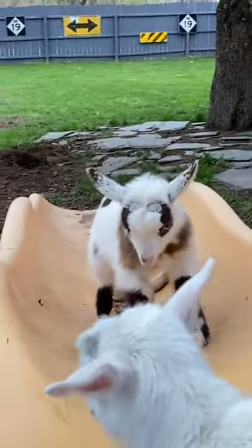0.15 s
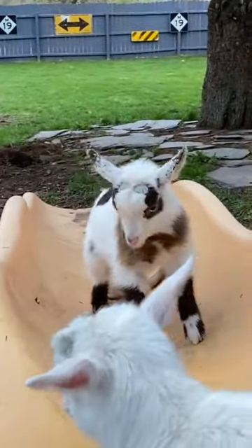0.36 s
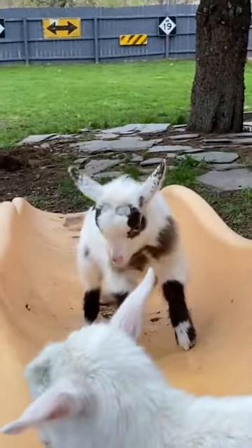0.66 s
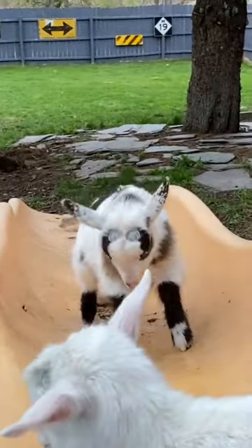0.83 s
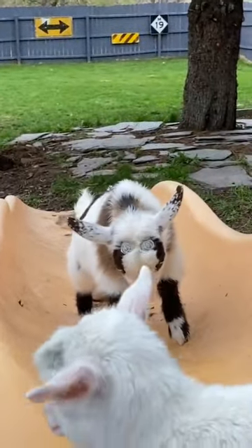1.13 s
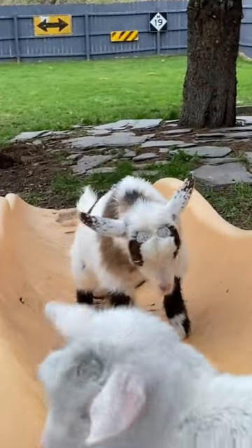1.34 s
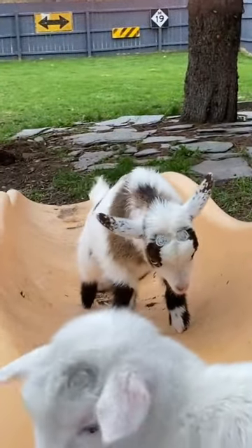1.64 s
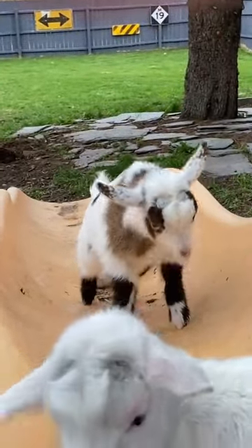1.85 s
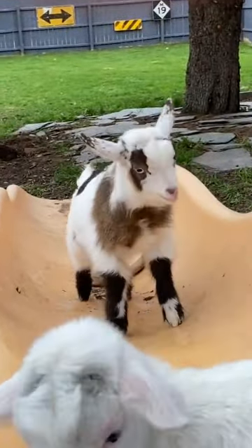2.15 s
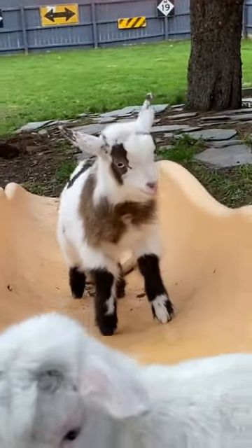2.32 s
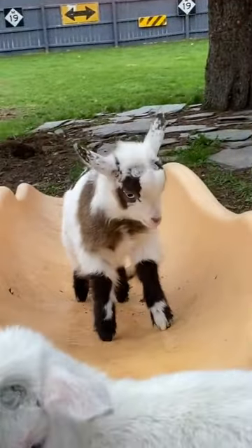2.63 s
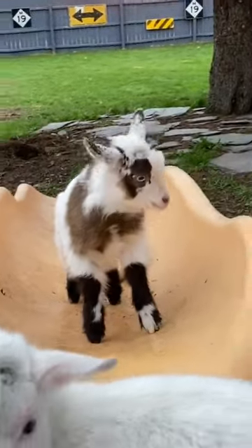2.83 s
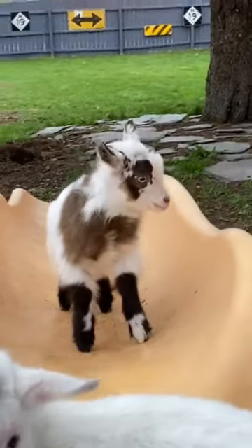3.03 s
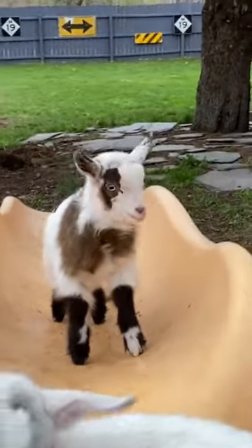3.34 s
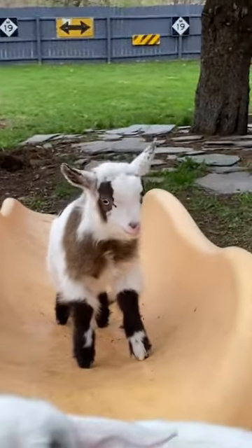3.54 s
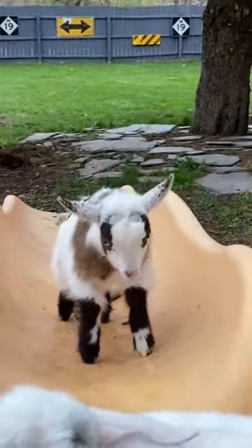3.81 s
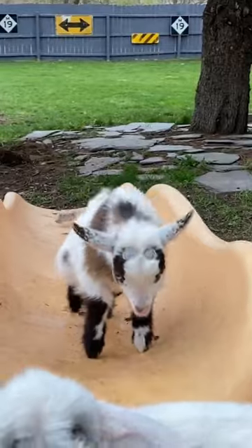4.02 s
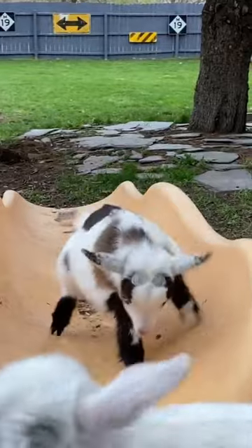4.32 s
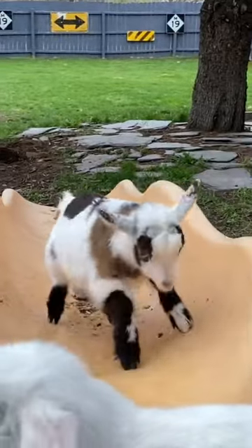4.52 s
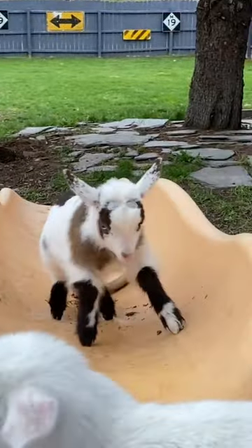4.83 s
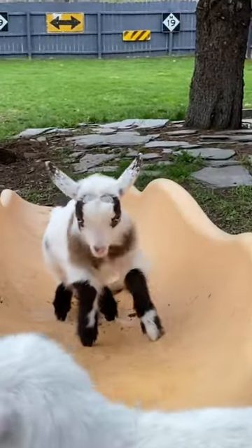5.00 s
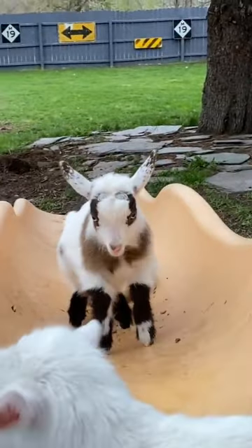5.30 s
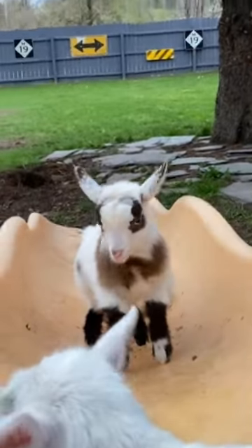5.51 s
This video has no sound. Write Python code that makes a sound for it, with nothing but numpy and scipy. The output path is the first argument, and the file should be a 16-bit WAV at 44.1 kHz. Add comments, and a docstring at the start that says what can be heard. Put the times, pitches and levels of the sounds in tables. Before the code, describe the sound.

Close stereo pickup beside a plastic playground slide in an open yard. Quiet traffic hum and very faint fur rustles and hoof skids come first, then a rapid run of loud, boomy, hollow knuckle knocks that fade. Later a goat's light hooves patter and slither in a dense half-second burst with hissing grit, then a few soft taps, and a single strong knock closes it.

```python
"""A young goat's hooves and fur skid and rustle on a hollow plastic slide on a lawn; faint peeps come between.
From 2.5 s knuckles rap the shell close by, and the fence returns an echo; near 4 s the goat slithers and
skips, with grit hissing under its hooves, and at 5.5 s comes a last rap. Distant traffic rumbles throughout.
Blows are decaying modes plus band-filtered noise, hiss and traffic are shaped noise, peeps are gliding sines."""
import sys
import numpy as np
from scipy import signal
from scipy.fft import rfft, irfft
from scipy.io import wavfile

SR = 44100
rng = np.random.default_rng(int(sys.argv[2]) if len(sys.argv) > 2 else 0)


def wav_record(signal):
    """Record a signal, one row per channel, as 16-bit PCM in the file named by sys.argv[1]."""
    frames = np.transpose(np.atleast_2d(signal))
    bounded = np.clip(frames, -1, 1)
    # unit amplitude maps onto the largest positive 16-bit level
    quanta = np.round(bounded * 32767).astype(np.int16)
    wavfile.write(sys.argv[1], SR, quanta)


N = 249606
BINS = np.maximum(np.arange(N // 2 + 1) * SR / N, 1)   # spectrum frequencies in Hz

# Knuckle raps. Each row: start in seconds, level in dB, damping factor, weight in dB,
# knock over body in dB, hardness in dB.
KNUCKLE_RAPS = [(2.475, -70.5, 0.54, 8.5, 11, 23.5), (2.71, -12.5, 0.89, -0.5, -3, -3.5),
                (2.891, -9.5, 1.04, -3, -3.5, -6.5), (3.039, -12.5, 1.15, 0.5, -5.5, -3),
                (3.179, -14.5, 1.01, -1.5, -2.5, -7), (3.316, -19.5, 1.17, 0, -6, -0.5),
                (5.505, -10.5, 1.16, -2.5, -1, -4.5)]
# Hoof falls. Each row: start in seconds, level in dB, damping factor, weight in dB,
# knock over body in dB, hardness in dB.
HOOF_FALLS = [(.022, -30.5, 2.2, -15, 15.5, -16.5), (.04, -41, 1.1, -5.5, 9, -14),
              (.075, -49.5, .9, -10, -1, -25), (4.113, -17.5, 1.84, -10, -1.5, -16.5),
              (4.125, -22, 0.87, -11.5, -8, -32), (4.148, -27, 0.95, 3, 5, -10.5),
              (4.16, -28, 1.3, -11, 7, -26), (4.174, -31, 0.63, -3.5, 6, -21),
              (4.207, -15, 1.44, -11, 4.5, -17), (4.213, -30.5, 1.5, -20, -6, -6),
              (4.231, -24.5, 0.6, -12, -0.5, -22.5), (4.271, -23, 1.3, -1.5, 2.5, -11.5),
              (4.28, -26, 0.95, -9, -3, -12), (4.302, -26, 0.69, -8, 1, -29),
              (4.32, -33, 1.1, 3.5, -5, -17), (4.332, -36.5, 0.67, -5, -2.5, -14),
              (4.365, -37, 1.1, -1, 2.5, -12), (4.794, -31.5, 1.1, -14.5, -2, -21),
              (4.819, -37.5, 0.82, -8, -2, -20), (4.845, -42.5, 1, -12, 1, -18)]
# Centres of a blow's boom, body, knock, clack and crack, in Hz.
STRIKE_CENTRES_HZ = (110, 370, 800, 1800, 4500)
# Modes of the shell. Each row: frequency in Hz, relative level in dB, decay time t60 in seconds at damping 1.
SHELL_MODES = [(47.4, -4.5, .3), (62.6, -5, 0.58), (91.9, -10.5, 0.38), (114.1, -5, 0.34),
               (140, -0.5, 0.26), (170.7, -12.5, 0.16), (201.3, -10.5, 0.11), (230, -14, 0.18),
               (277.3, -17.5, 0.35), (318, -11.5, 0.21), (387, -8, 0.14), (486.7, -2.5, 0.07),
               (553.3, -9, 0.11), (702.6, -9, 0.089), (788, -8, .11), (879, -10.5, 0.051),
               (1017.6, -9, 0.14), (1224, -24, 0.094), (1443, -8, 0.14), (1620, -20, 0.058),
               (1994, -11.5, 0.012), (2360, 5.5, 0.0085), (2907, -7.5, 0.02), (3270, 2.5, 0.0082),
               (3860, 1, 0.011), (4430, 2.5, 0.0097), (5030, -2.5, 0.013), (6140, 0, 0.0083),
               (8000, -12, 0.0296), (11330, -19, 0.0035)]
# Dense small modes, heard as dying noise. Each row: frequency in Hz, relative density in dB per Hz.
RATTLE_SPECTRUM = [(100, -2), (150, -3.5), (254, -7), (420, -8.5), (700, -8.5), (1040, -11), (1400, -9.5),
                   (1700, -2), (2300, -12.5), (4000, -22.5), (6640, -29.5), (8500, -37.5), (11000, -36),
                   (13500, -74), (16000, -70)]
# Decay of that noise. Each row: frequency in Hz, decay time t60 in seconds at damping 1.
RATTLE_DECAY = [(150, .22), (500, 0.21), (2000, 0.088), (6000, 0.12), (14000, 0.0476)]
# Phase between the ports for raps. Each row: frequency in Hz, lead of the left port in radians.
RAP_PHASE_LEAD = [(0, 0), (60, -.45), (130, -.85), (290, -1.55), (640, -2.1), (2150, -3.6), (3700, -7.3),
                  (6200, -12.6), (9700, -18.3), (16500, -25.3)]
# Level between the ports for raps. Each row: frequency in Hz, left over right in dB.
RAP_PORT_BALANCE = [(60, -6.5), (150, -2), (380, -8), (950, -1.5), (2380, 1), (5980, 8), (15000, -6.5)]
# Coherence of the ports for hooves. Each row: frequency in Hz, left-right likeness from -1 to 1.
HOOF_COHERENCE = [(60, 1), (180, 0.88), (550, 0.71), (1650, 0.12), (4970, 0.018), (15000, 0.4)]
# Short skids on grit. Each row: time of the top in seconds, top level in dB, rise in seconds, fall in seconds.
SHORT_SKIDS = [(.04, -68, 0.056, .1), (.2, -65, 0.24, 0.095), (.512, -76, .02, .05),
               (.875, -66.5, 0.073, 0.028), (1.9, -79, .015, .08), (2.05, -70, .03, 0.11),
               (3.76, -69, 0.045, 0.08), (3.905, -61, .02, 0.098), (3.95, -64.5, 0.085, 0.017),
               (4.562, -64, .04, 0.036), (4.688, -60, .035, 0.052), (4.75, -74, .04, .03),
               (4.8, -62, 0.013, 0.088), (5.025, -59.5, 0.16, 0.051), (5.078, -64, 0.018, 0.039),
               (5.288, -76, .04, 0.12)]
# The long slither. Each row: time in seconds, level in dB.
LONG_SLITHER = [(3.97, -76), (4.075, -53.5), (4.1, -51.5), (4.165, -44), (4.22, -45.5), (4.265, -51.5),
                (4.29, -56.5), (4.338, -51), (4.396, -59), (4.47, -60.5), (4.51, -79)]
# Spectrum of the grit hiss. Each row: frequency in Hz, relative density in dB per Hz.
GRIT_SPECTRUM = [(1470, -44), (2500, -13), (4210, -23.5), (6760, -12), (8370, -22), (9270, -13.5),
                 (10700, -5.5), (12700, -21), (13400, -63), (14000, -30), (15000, -22), (16100, -37),
                 (16500, -61)]
# Lone grit ticks. Each row: start in seconds, peak level in dB, frequency in Hz.
GRIT_TICKS = [(1.8994, -61, 5050), (4.1123, -32, 4950), (4.27, -29, 10600), (5.1517, -55, 6090),
              (5.1951, -64, 4680), (5.2857, -49, 4600)]
# Fur rustles on the shell. Each row: time of the top in seconds, top level in dB, rise in seconds,
# fall in seconds.
FUR_RUSTLES = [(.23, -62.5, 0.33, .2), (.354, -61, 0.026, 0.04), (.97, -63.5, 0.05, 0.23),
               (1.1, -58.5, 0.16, 0.13), (1.165, -60.5, .15, .05), (1.872, -68, .01, .15),
               (2.088, -66, 0.076, 0.044)]
# Spectrum of the rustle. Each row: frequency in Hz, relative density in dB per Hz.
RUSTLE_SPECTRUM = [(1000, -31), (1700, 1.5), (1800, -20), (2020, -3), (2440, -19), (2640, -11), (4240, -15),
                   (5450, -21.5), (6310, -18.5), (8570, -39), (9000, -46), (11700, -71), (19800, -120)]
# Brief faint tones, mostly far birds. Each row: start in seconds, length in seconds, start frequency in Hz,
# end frequency in Hz, level in dB.
FAINT_TONES = [(1.217, .025, 3170, 2950, -61.5), (2.207, 0.087, 3130, 3270, -64),
               (5.231, 0.029, 555, 550, -42), (5.34, 0.031, 5700, 5700, -66),
               (5.581, 0.058, 3600, 3430, -59.5)]
# Distant traffic. Each row: time in seconds, rumble level in dB, rush level in dB.
TRAFFIC_LEVELS = [(0, -53, -52), (.4, -51, -54), (1.4, -52, -55), (2.4, -51.5, -54.5), (3.5, -48, -51.5),
                  (4.0, -45.5, -48.5), (4.5, -45, -49), (5.0, -46.5, -48), (5.3, -47.5, -47.5),
                  (5.66, -42, -46.5)]
# Spectrum of the traffic. Each row: frequency in Hz, relative density in dB per Hz.
TRAFFIC_SPECTRUM = [(25, -20), (58, -4), (78, -0.5), (127, -8.5), (200, -17), (340, -23.5), (520, -21),
                    (900, -19.5), (1300, -22), (1700, -24.5), (2760, -35.5), (4490, -43), (8000, -54.5),
                    (16000, -71.5)]
# Coherence of the ports for traffic. Each row: frequency in Hz, left-right likeness from -1 to 1.
TRAFFIC_COHERENCE = [(60, 0.97), (150, 0.85), (380, 0.27), (950, -0.11), (2380, 0.19), (5980, 0.083),
                     (15000, -0.41)]
# Level between the ports for traffic. Each row: frequency in Hz, left over right in dB.
TRAFFIC_PORT_BALANCE = [(60, -4), (180, -3), (550, 0.5), (1650, 3), (4970, 2), (15000, -5)]

RAP_CRACK_DB, HOOF_CRACK_DB = 0.4, -8   # crack over clack
SNAP_DB, SNAP_S = 5.5, 0.0017   # extra rattle at the first instant of contact, and its time constant
AHEAD_S, AHEAD_DB = .0025, -18.5   # a faint bright copy of each rap, 2.5 ms ahead of it
YARD_DB, YARD_T60_S, YARD_SPREAD_DB = -56.5, 0.36, 4.5   # scatter from trunk, stones and walls
FENCE_S, FENCE_DB = .0645, -39   # delay and level of the fence echo
BEYOND_S, BEYOND_DB = 0.23, -5   # end of the answers, and level change past the fence
BRIGHT_HZ = 1560   # the copy ahead, the scatter and the echo carry mainly what lies above this
SWELL_DB = 16.5   # gained over a rise, lost over a fall
DRAG_DB, DRAG_FOLLOWS = -44, 1.36   # rustle under the loudest skidding; share of the hiss's swing in dB
CUTOFF_HZ = 16900


def from_db(db):
    """Amplitude ratio: 20 dB to each factor of ten."""
    return 10 ** (np.asarray(db) / 20)


def rms_one(x):
    """Normalisation: divide by the root mean square."""
    return x / np.sqrt(np.mean(x ** 2) + 1e-20)


def in_time(rows):
    """Linear interpolation of each column of a time curve at every sample."""
    seconds, *columns = np.transpose(rows)
    return [np.interp(np.arange(N) / SR, seconds, column) for column in columns]


def at_hz(points, hz):
    """Interpolation of a spectrum along a logarithmic frequency axis."""
    point_hz, values = np.array(points)[:, 0], np.array(points)[:, 1]
    return np.interp(np.log(hz), np.log(point_hz), values)


def drift(rate_hz):
    """Slow random fluctuation: white noise through two equal low-pass poles, rms about 1."""
    pole = np.exp(-2 * np.pi * rate_hz * 40 / SR)   # one step is 40 samples
    white = rng.standard_normal(N // 40 + 2002)
    slow = signal.lfilter([1], [1, -2 * pole, pole * pole], white)[2000:]   # filter has settled
    return np.interp(np.arange(N) / 40, np.arange(len(slow)), rms_one(slow))


def coloured(spectrum, grain_db=0.):
    """Spectral shaping: white noise weighted by frequency, rms 1; uneven grain sizes make it gritty."""
    sizes = from_db(grain_db * np.minimum(rng.exponential(1, N), 5))
    grains = rng.standard_normal(N) * sizes
    return rms_one(irfft(rfft(grains) * from_db(at_hz(spectrum, BINS)), N))


def ports(mid, side, alike, balance_db=0, lead=0):
    """Coherence: two ports mix a shared and an unshared part, with level and phase difference by frequency."""
    alike = np.clip(alike, -1, 1)
    tilt = from_db(balance_db / 2) * np.exp(.5j * lead)
    shared = np.sqrt(1 + alike) * rfft(mid)
    own = np.sqrt(1 - alike) * rfft(side)
    left_right = np.array([(shared + own) * tilt, (shared - own) / tilt])
    return irfft(left_right, N) / np.sqrt(2)


def shell_modes(strike, damping, spread_db, rise_cycles, smear_cycles, t):
    """Modal superposition: a blow excites decaying sines, and the lows take longer to swell."""
    hz, mode_db, t60 = np.transpose(SHELL_MODES)[:, :, None]
    sign = (-1) ** np.arange(len(hz))[:, None]   # neighbouring modes start in opposite directions
    fickle = np.clip(hz / 700, .2, 1)   # long waves hardly notice where the blow lands
    late = smear_cycles * fickle / hz * rng.random((2, len(hz), 1))   # the contact rolls over part of its cycles
    chance_db = spread_db * fickle * rng.standard_normal((2, len(hz), 1))
    gain = from_db(mode_db + at_hz(strike, hz) + chance_db)
    age = np.maximum(t - late, 0)
    rise = 1 - np.exp(-age * hz / rise_cycles)
    fade = from_db(-60 * damping * age / t60) * rise
    return np.sum(sign * gain * fade * np.sin(2 * np.pi * hz * age), axis=1)


def shell_rattle(strike, damping, rattle_db, t):
    """High modal density: crowded small modes act as noise bands, each dying at its own rate."""
    edges = 120 * 2 ** np.arange(0, 7.3, .5)   # half-octave bands, in Hz
    snap = 1 + from_db(SNAP_DB) * np.exp(-t / SNAP_S)
    # loose joints chatter unevenly, in lumps of 100 samples
    lumps = np.repeat(from_db(1.73 * rng.standard_normal(len(t) // 100 + 1)), 100)[:len(t)]
    white = rng.standard_normal((2, 2, len(t))) * lumps
    sound = np.zeros((2, len(t)))
    for k, (low, high) in enumerate(zip(edges, edges[1:])):
        centre = np.sqrt(low * high)
        level_db = rattle_db + at_hz(RATTLE_SPECTRUM, centre) + at_hz(strike, centre)
        dying = from_db(level_db - 60 * damping * t / at_hz(RATTLE_DECAY, centre)) * snap
        band = signal.butter(2, (low, high), "band", fs=SR, output="sos")
        sound += signal.sosfilt(band, white[k % 2] * dying)   # neighbouring bands use separate noises
    return sound


def blows(table, crack_db, rattle_db, spread_db, rise_cycles, smear_cycles, ring_s):
    """Impact excitation: the spectrum of each strike weights modes and rattle, rendered twice."""
    out = np.zeros((2, N + SR))
    t = np.arange(round(SR * ring_s)) / SR
    closing = np.cos(np.pi * t / t[-1] / 2) ** .5
    for start_s, blow_db, damping, weight_db, knock_db, hard_db in table:
        strike_db = (weight_db, -knock_db / 2, knock_db / 2, hard_db, hard_db + crack_db)
        strike = list(zip(STRIKE_CENTRES_HZ, strike_db))
        sound = shell_modes(strike, damping, spread_db, rise_cycles, smear_cycles, t)
        sound = sound + shell_rattle(strike, damping, rattle_db, t)
        at = round(start_s * SR)
        out[:, at:at + len(t)] += from_db(blow_db) * sound * closing
    return out[:, :N]


def yard_answer():
    """Reflection: decaying random scatter of uneven strength, with one clear fence echo."""
    t = np.arange(round(BEYOND_S * SR)) / SR
    sizes_db = YARD_SPREAD_DB * np.minimum(rng.exponential(1, (2, len(t))), 5)   # a few surfaces stand out
    level = from_db(YARD_DB + sizes_db - 60 * t / YARD_T60_S)
    yard = level * rng.standard_normal((2, len(t))) * (t > .008)   # no scatter in the first 8 ms
    yard[:, t > FENCE_S] *= from_db(BEYOND_DB)
    yard[:, round(FENCE_S * SR)] = from_db(FENCE_DB)
    return yard


def raps():
    """Direct and reflected sound: knuckles strike close by, and the yard returns the treble."""
    mid, side = blows(KNUCKLE_RAPS, RAP_CRACK_DB, rattle_db=18.0, spread_db=1.5,
                      rise_cycles=0.38, smear_cycles=3.01, ring_s=1 / 4)
    bright = signal.sosfilt(signal.butter(2, BRIGHT_HZ, "high", fs=SR, output="sos"), mid)
    mid = mid + from_db(AHEAD_DB) * np.roll(bright, -round(AHEAD_S * SR))
    lead = np.interp(BINS, *np.transpose(RAP_PHASE_LEAD))
    near = ports(mid, side, 0.86, at_hz(RAP_PORT_BALANCE, BINS), lead)
    return near + signal.fftconvolve(bright[None], yard_answer(), axes=1)[:, :N]


def hooves():
    """Impact by a light body: hooves excite the same shell modes, but miss the deepest."""
    mid, side = blows(HOOF_FALLS, HOOF_CRACK_DB, rattle_db=15.0, spread_db=1.0,
                      rise_cycles=0.25, smear_cycles=0.63, ring_s=1 / 7)
    light = signal.sosfilt(signal.butter(2, 85, "high", fs=SR, output="sos"), [mid, side])
    return ports(*light, at_hz(HOOF_COHERENCE, BINS), -0.5)


def stretch(rows):
    """Envelope of one continuous slide, opening and closing within 4.5 ms."""
    level_db, = in_time(rows)
    start_s, end_s = rows[0][0], rows[-1][0]
    t = np.arange(N) / SR
    return from_db(level_db) * np.clip(np.minimum(t - start_s, end_s - t) / 0.0045, 0, 1)


def swells(table):
    """Exponential growth and decay: gains climb to a top and sink evenly in dB, and are summed."""
    t = np.arange(0, N + 20, 20) / SR   # worked out every 20 samples
    gain = np.zeros(len(t))
    for top_s, top_db, rise_s, fall_s in table:
        away = np.maximum((top_s - t) / rise_s, (t - top_s) / fall_s)
        gain += from_db(top_db - SWELL_DB * np.minimum(away, 10))
    return np.interp(np.arange(N) / SR, t, gain)


def skidding():
    """Sliding contact: the summed envelope of all hooves sliding on the shell."""
    return swells(SHORT_SKIDS) + stretch(LONG_SLITHER)


def grit():
    """Granular friction: crowded grains hiss under each skid, and lone grains tick."""
    hiss = np.array([coloured(GRIT_SPECTRUM, 2.4), coloured(GRIT_SPECTRUM, 2.1)])
    out = skidding() * from_db(2.0 * drift(32)) * hiss
    t = np.arange(400) / SR
    for start_s, peak_db, hz in GRIT_TICKS:
        band = [hz / 1.2, min(hz * 1.3, .45 * SR)]
        sos = signal.butter(1, band, "band", fs=SR, output="sos")
        tick = signal.sosfilt(sos, rng.standard_normal((2, len(t))) * np.exp(-t / 0.0029))
        at = round(start_s * SR)
        out[:, at:at + len(t)] += from_db(peak_db) * tick / np.abs(tick).max()
    return out


def brush():
    """Resonant friction: fur and every skid raise a soft rustle in the shell's upper resonances."""
    drag = skidding()
    under_skids = from_db(DRAG_DB) * (drag / drag.max()) ** DRAG_FOLLOWS
    level = (swells(FUR_RUSTLES) + under_skids) * from_db(1.74 * drift(25))
    return level * ports(coloured(RUSTLE_SPECTRUM, 2.2), coloured(RUSTLE_SPECTRUM, 2.2), 0.41)


def faint_tones():
    """Frequency modulation: short sines glide in pitch while their phase wanders at random."""
    out = np.zeros(N)
    for start_s, length_s, start_hz, end_hz, level_db in FAINT_TONES:
        t = np.arange(int(length_s * SR)) / SR
        glide = 2 * np.pi * np.cumsum(np.linspace(start_hz, end_hz, len(t))) / SR
        waver = np.cumsum(rng.normal(0, 0.062, len(t)))
        envelope = np.sin(np.pi * t / length_s) ** .5
        at = round(start_s * SR)
        out[at:at + len(t)] += from_db(level_db) * envelope * np.sin(glide + waver)
    return out


def traffic():
    """Band splitting: one wide noise is parted near 220 Hz into rumble and rush, each with its own level."""
    rumble_db, rush_db = in_time(TRAFFIC_LEVELS)
    air = ports(coloured(TRAFFIC_SPECTRUM), coloured(TRAFFIC_SPECTRUM),
                at_hz(TRAFFIC_COHERENCE, BINS), at_hz(TRAFFIC_PORT_BALANCE, BINS))
    low = irfft(rfft(air) / (1 + (BINS / 220) ** 4), N)
    rumble = from_db(rumble_db + 0.39 * drift(1.7)) * rms_one(low)
    rush = from_db(rush_db + 0.73 * drift(23)) * rms_one(air - low)
    return rumble + rush


def scene():
    """Linear superposition of all sources at the two ports."""
    return raps() + hooves() + grit() + brush() + faint_tones() + traffic()


def record(dry):
    """Band limiting and saturation: the deepest bass is lost, peaks are rounded, the top is cut."""
    dry = signal.sosfilt(signal.butter(2, 36, "high", fs=SR, output="sos"), dry)
    rounded = 1.335 * np.tanh(dry / 1.263)
    return signal.sosfilt(signal.cheby2(16, 95, CUTOFF_HZ, fs=SR, output="sos"), rounded)


dry = scene()
out = record(dry)
wav_record(out)
```